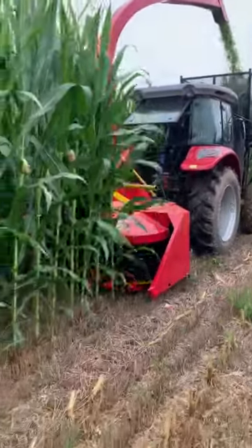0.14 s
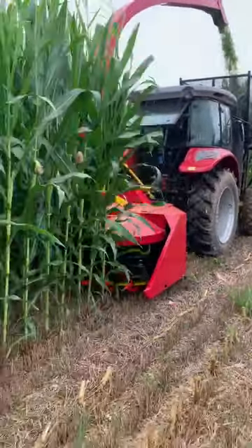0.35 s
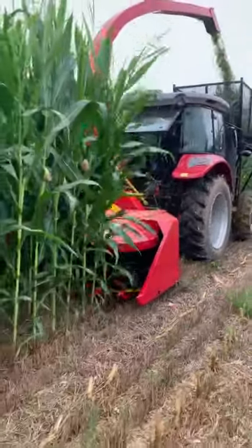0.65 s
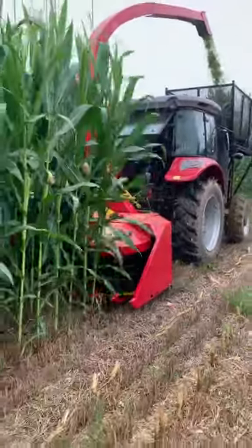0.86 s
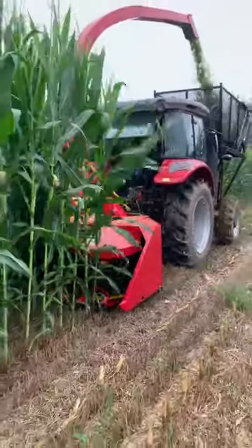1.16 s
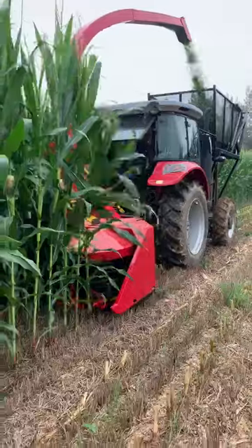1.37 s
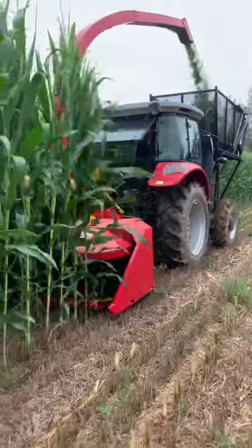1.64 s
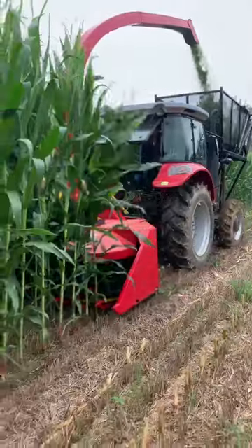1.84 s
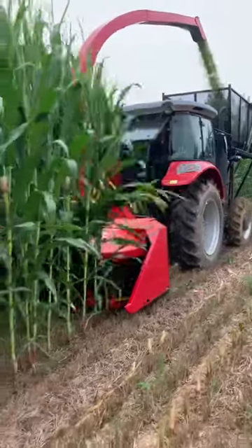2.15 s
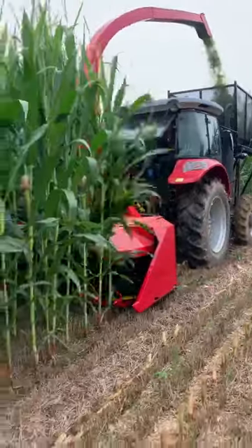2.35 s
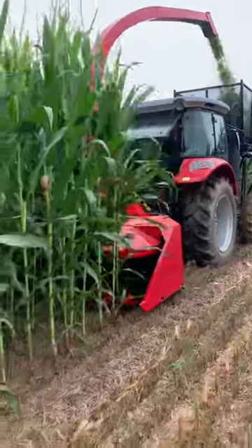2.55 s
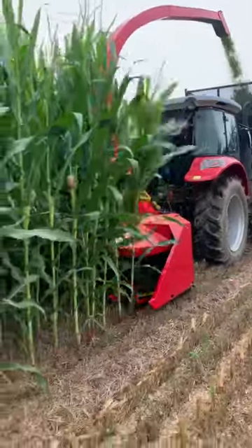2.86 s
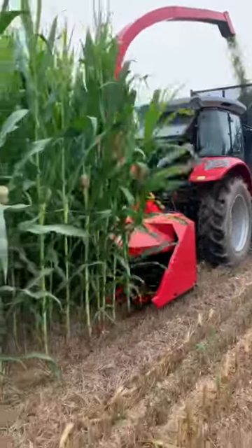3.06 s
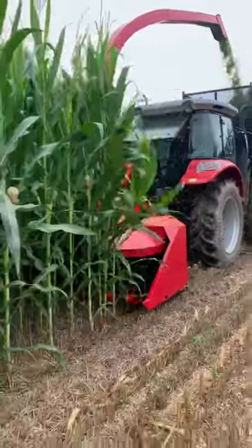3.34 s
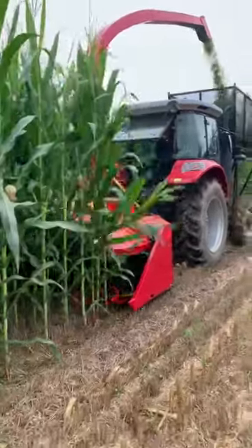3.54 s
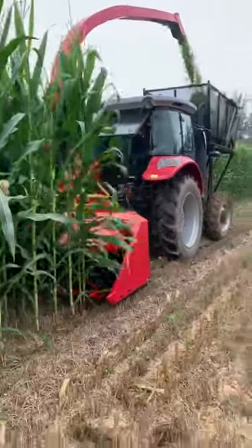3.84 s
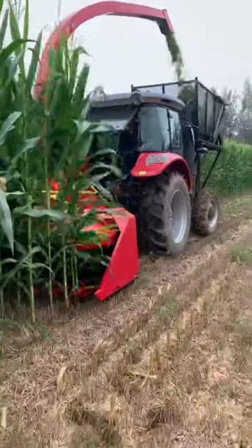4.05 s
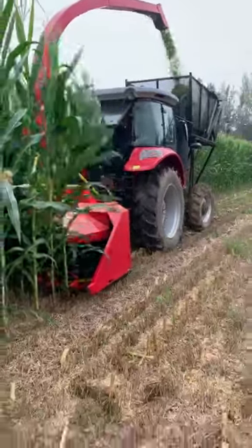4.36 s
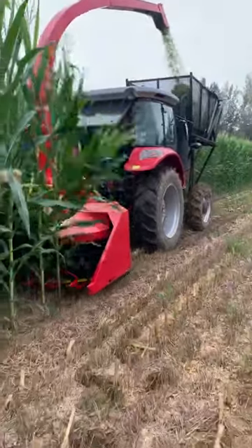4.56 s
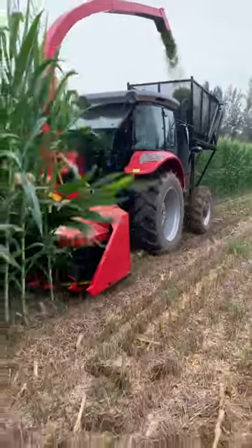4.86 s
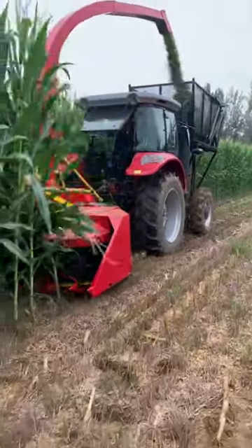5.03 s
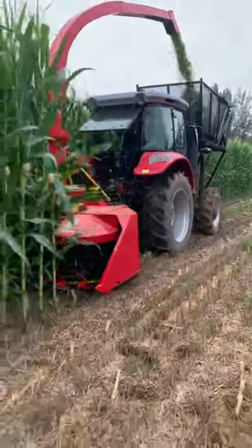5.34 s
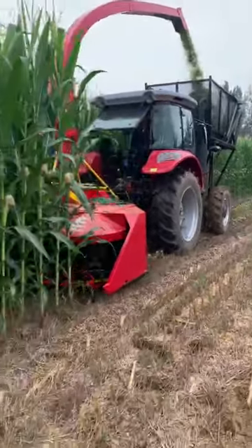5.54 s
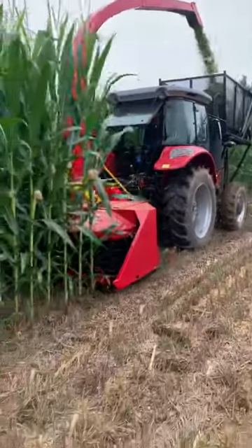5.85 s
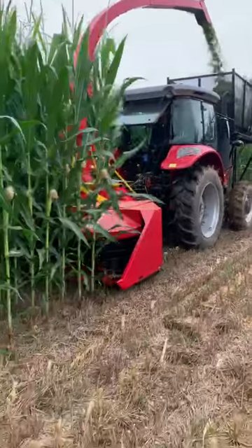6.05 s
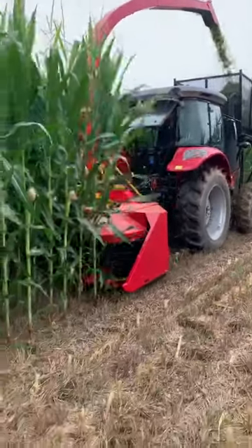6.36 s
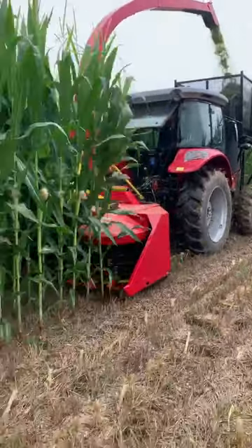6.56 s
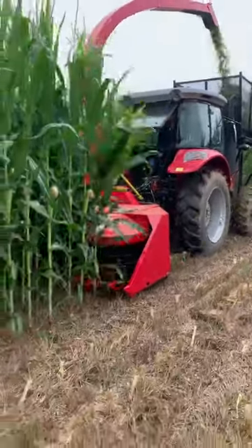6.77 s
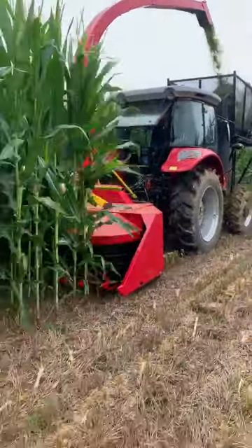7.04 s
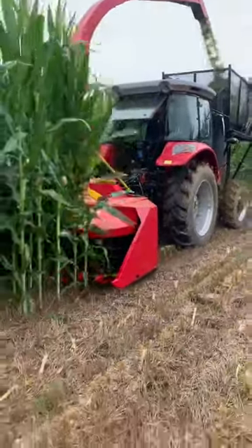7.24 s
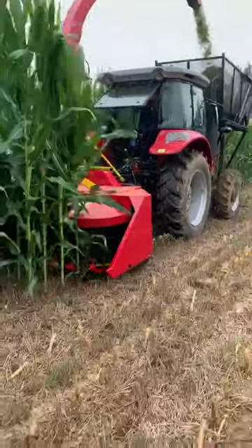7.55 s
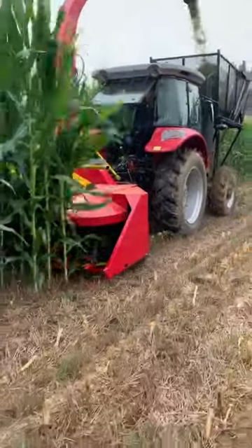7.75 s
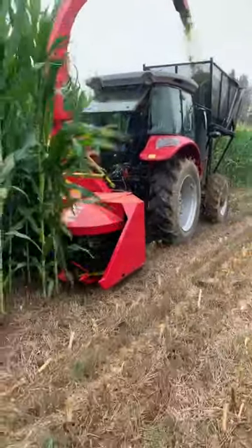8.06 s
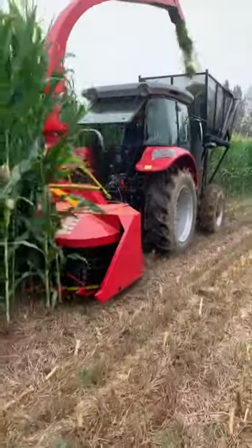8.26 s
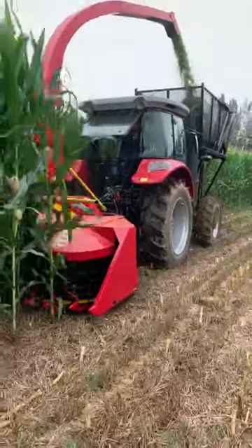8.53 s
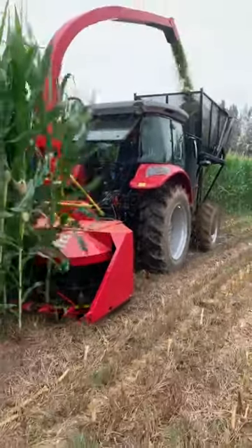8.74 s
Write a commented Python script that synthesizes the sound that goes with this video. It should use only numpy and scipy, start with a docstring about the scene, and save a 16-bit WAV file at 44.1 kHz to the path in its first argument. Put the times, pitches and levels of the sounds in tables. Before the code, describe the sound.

From 0 to about 8.9 seconds a tractor-driven chopper works steadily through tall maize, heard close in open air with wide stereo and no echo. A strong drone around 160 hertz holds throughout, dipping slightly under load, with an unsteady octave, thin wavering whines and a rough growl above and throbbing diesel rumble below. Knives rasp constantly in the midrange; leaves tear in several dry, bright gusts each second over a faint steady spout hiss. Stalks crack in a cluster at 0-0.8, then more sparsely, with cob knocks near 1.7 and 3.3. From 4.0 to 5.4 snaps and knocks thicken and the drone sags most, around 4.5-4.9. It eases and rises slightly in pitch from 6 to 7.5, with quick tearing bursts around 7. After 7.7 the load returns, the octave surges near 7.9, and snaps crowd 8.7-8.9, with a harder knock near 8.75. It stops mid-work.

```python
"""A chopper flywheel, tractor-driven through standing maize, drones at its blade rate and sags under load.
Its octave, whines and growl are wavering sines locked to the shaft; diesel and drive line hum and rumble below.
Knives rasp: noise and tiny cracks gated by the blade strokes. Leaves crackle as they tear, over a steady spout hiss.
Stalks crack and cobs knock at listed times: short decaying bursts of coloured noise."""
import sys
import numpy as np
from scipy import signal
from scipy.fft import rfft, irfft
from scipy.io import wavfile

SR = 44100
rng = np.random.default_rng(int(sys.argv[2]) if len(sys.argv) > 2 else 0)


def log_audio(samples):
    """Write samples as a 16-bit WAV file to the path given in sys.argv[1]."""
    # one column per channel
    frames = np.atleast_2d(samples).T
    # limit to full scale, then quantise
    limited = np.clip(frames, -1, 1)
    pcm = np.round(limited * 32767).astype(np.int16)
    wavfile.write(sys.argv[1], SR, pcm)


N = 392490
TIME = np.arange(N) / SR
BINS = np.arange(N // 2 + 1) * SR / N

# flywheel strain from the crop: [t/s, strain 0-1]
STRAIN = [(0.0, 0.5), (0.72, 0.49), (0.92, 0.39), (1.06, 0.48), (1.17, 0.3), (1.66, 0.68), (1.86, 0.46),
          (2.0, 0.57), (2.37, 0.51), (2.62, 0.31), (2.9, 0.5), (3.4, 0.47), (3.64, 0.72), (3.95, 0.37),
          (4.28, 0.27), (4.46, 0.98), (4.56, 0.59), (4.65, 1.0), (4.75, 0.62), (4.88, 1.0), (4.98, 0.59),
          (5.07, 0.67), (6.04, 0.12), (6.13, 0.26), (6.78, 0.04), (7.02, 0.28), (7.12, 0.08), (7.22, 0.21),
          (7.34, 0.0), (7.45, 0.5), (7.55, 0.09), (7.66, 0.14), (7.79, 0.87), (7.91, 0.51), (8.01, 0.71),
          (8.2, 0.65), (8.33, 0.88), (8.9, 0.65)]
# blade tone: [t/s, level/dB]
BLADE_LEVEL_DB = [(0.0, -20.5), (0.61, -19), (1.21, -23), (2.04, -21), (2.31, -18.5), (2.55, -20.5),
                  (4.02, -22), (4.36, -19.5), (4.48, -23), (6.44, -20), (6.58, -24), (7.54, -24.5),
                  (7.81, -21.5), (8.49, -19.5), (8.65, -26), (8.9, -23)]
# octave of the blade tone: [t/s, level/dB]
OCTAVE_LEVEL_DB = [(0.0, -34), (0.14, -21.5), (0.24, -29.0), (0.62, -23), (1.05, -28.5), (1.26, -28),
                   (1.38, -25.5), (2.05, -24.0), (2.28, -33), (2.45, -28), (2.78, -40), (2.85, -33),
                   (3.19, -26.0), (3.5, -25.5), (3.68, -31), (3.98, -27.0), (4.11, -37.0), (4.23, -23),
                   (4.4, -29), (4.77, -25.5), (4.86, -34.5), (5.18, -21), (5.63, -20), (5.76, -26.0),
                   (6.04, -20.5), (6.3, -31), (6.44, -28.5), (6.5, -40), (6.69, -32), (6.77, -34),
                   (6.93, -21.5), (7.02, -45), (7.39, -28.5), (7.48, -25), (7.6, -42), (7.66, -16),
                   (7.76, -33), (7.9, -13.5), (8.09, -31.0), (8.36, -22.5), (8.44, -37), (8.58, -17.5),
                   (8.74, -29.5), (8.9, -22)]
# whine at 5 x blade rate: [t/s, level/dB]
WHINE_LEVEL_DB = [(0.0, -36), (0.25, -35.5), (0.4, -32.5), (1.08, -28.5), (1.28, -36), (1.46, -28),
                  (1.77, -37), (2.01, -33), (2.32, -38.5), (2.49, -28.0), (2.62, -33.5), (2.99, -39),
                  (3.15, -30), (3.52, -38), (3.8, -27.5), (4.19, -43), (4.4, -27.5), (4.54, -35),
                  (5.01, -27), (5.26, -43), (5.37, -27.5), (5.75, -48), (6.09, -31), (6.44, -36),
                  (6.58, -36.5), (6.81, -38), (6.99, -37.5), (7.65, -56), (7.73, -32), (7.88, -29.5),
                  (8.16, -36), (8.6, -27), (8.76, -42), (8.9, -23.5)]
# upper whine at 6 x blade rate: [t/s, level/dB]
UPPER_WHINE_LEVEL_DB = [(0.0, -45), (0.16, -36), (0.36, -39), (0.48, -35.5), (0.6, -39), (1.44, -40),
                        (1.62, -33), (1.89, -53), (2.0, -33), (3.1, -48), (3.23, -31), (3.68, -40),
                        (3.82, -29), (3.98, -42.0), (4.28, -41.5), (4.64, -24), (4.79, -38), (5.16, -25.5),
                        (5.3, -39), (5.58, -32), (6.12, -36), (6.72, -34), (6.82, -35), (7.46, -54),
                        (7.88, -23.5), (8.06, -39), (8.18, -30), (8.9, -31)]
# knife-stroke overtones: [multiple of blade rate, level unstrained/dB, change at full strain/dB]
KNIFE_TONES = [(3, -48, 12), (4, -32.5, 2.5), (7, -53.5, 23.5), (8, -40, -3.5), (9, -59.5, 25),
               (10, -43.5, 3.5), (11, -60, -9)]
# diesel and drive-line hum: [multiple of blade rate, level before the rumble swell/dB]
DRIVE_TONES = [(.225, -53), (.45, -39), (.56, -45), (.675, -33.5), (1.35, -40.5), (1.578, -32.5),
               (1.665, -30.5), (1.73, -36.5), (2.25, -42.5), (2.525, -47.5), (4.451, -51), (5.4, -48.5)]
# swell shared by hum and rumble: [t/s, gain/dB]
RUMBLE_SWELL_DB = [(0.0, -2), (0.18, -2.5), (0.65, -0.5), (0.99, -1), (1.77, -1), (1.95, -2.5),
                   (2.84, -2.2), (3.57, -1.5), (4.23, -1), (5.05, -1), (5.3, -1.1), (6.22, -1),
                   (7.16, -1.8), (7.96, -0.5), (8.9, -2)]
# machine rumble spectrum: [f/Hz, relative level/dB]
RUMBLE_SPECTRUM = [(22, -48), (34, -25), (55, -9.5), (80, -6), (135, 1.5), (165, 0), (205, -5), (285, 2.5),
                   (370, -2.5), (430, -9.5), (520, -20.5), (700, -30), (1500, -32), (4000, -54),
                   (15000, -60)]
# chopping before trim and flutter: [t/s, level/dB]
CHOP_LEVEL_DB = [(0.0, -21), (1.34, -24.5), (1.42, -22.5), (2.2, -22.5), (2.69, -24.5), (3.6, -22.5),
                 (3.85, -24.5), (4.0, -26), (4.22, -24.5), (4.38, -23.5), (4.66, -21.5), (4.95, -21),
                 (5.12, -22.5), (5.77, -23), (6.28, -23), (6.52, -23.5), (7.61, -24.5), (7.84, -20.5),
                 (8.06, -21.5), (8.57, -21), (8.9, -23)]
# chopping spectrum: [f/Hz, relative level/dB]
CHOP_SPECTRUM = [(300, -25), (560, -7), (670, 1.5), (820, 4), (1000, 2.5), (1200, -1), (1400, 2),
                 (2000, -5), (2550, -6.5), (3200, -12.5), (5000, -33), (15000, -24)]
# plants torn into the intake: [t/s, hold/s, level before tear gain/dB, release/s]
TEARS = [(0.015, 0.0083, -29.5, .03), (0.054, 0.025, -30.5, 0.036), (0.149, .008, -28.5, 0.012),
         (0.27, .03, -42, .03), (0.346, .015, -27.5, 0.037), (0.41, 0.017, -25.5, 0.03),
         (0.494, 0.044, -31, 0.05), (0.655, 0.025, -34, .02), (0.736, 0.013, -29.5, 0.029),
         (0.794, 0.055, -31.5, 0.073), (1.143, 0.031, -27, 0.043), (1.24, .01, -43, .03),
         (1.414, 0.052, -28.5, 0.049), (1.782, 0.048, -28.5, 0.035), (1.859, 0.069, -30, 0.085),
         (2.055, 0.076, -33.5, 0.065), (2.195, 0.023, -27, 0.036), (2.558, 0.022, -27, 0.038),
         (2.872, .02, -33, 0.014), (3.046, 0.037, -29.5, 0.037), (3.151, 0.11, -33.5, .05),
         (3.351, 0.013, -26.5, 0.013), (3.437, 0.044, -33, 0.021), (3.598, 0.014, -29.5, 0.031),
         (3.739, 0.048, -32, 0.093), (3.912, 0.0095, -33, .01), (4.092, 0.025, -30, 0.064),
         (4.387, 0.013, -28.5, 0.029), (4.49, .01, -33, 0.044), (4.664, 0.079, -33.5, 0.033),
         (4.817, 0.02, -34, 0.017), (4.931, 0.04, -45, 0.039), (5.094, 0.029, -32.5, 0.03),
         (5.207, .015, -29, .03), (5.28, 0.031, -36, 0.031), (5.39, 0.034, -33.5, 0.023),
         (5.887, .07, -29.5, 0.062), (6.258, 0.13, -29, .04), (6.537, 0.018, -29.5, 0.021),
         (6.653, 0.015, -28.5, 0.04), (6.726, 0.014, -28.5, 0.061), (6.89, .03, -31.5, 0.017),
         (6.954, 0.0081, -31, 0.021), (7.027, 0.031, -27.5, 0.021), (7.101, 0.041, -40, 0.029),
         (7.223, 0.0073, -32, .015), (7.335, 0.049, -27.5, 0.031), (7.412, .01, -32.5, 0.037),
         (7.507, 0.0093, -28.5, 0.026), (7.617, 0.026, -27, .015), (7.672, 0.044, -30, 0.046),
         (7.785, 0.068, -33, 0.055), (7.944, 0.086, -36.5, 0.033), (8.034, 0.062, -26, 0.05),
         (8.351, 0.05, -27.5, 0.042), (8.447, 0.048, -30, 0.048), (8.681, 0.027, -28.5, 0.018),
         (8.761, 0.034, -31.5, 0.089)]
# fracture ring ranges, thick stalk to thin leaf: [lower edge f/Hz, upper edge f/Hz]
FIBRE_BANDS_HZ = [(1200, 3200), (3200, 5500), (5500, 7500), (7500, 11000), (11000, 16000)]
# leaf and spout spectrum: [f/Hz, relative level/dB]
LEAF_SPECTRUM = [(1000, -7), (2500, 5), (3400, 2), (4000, 4.5), (4600, 3.5), (5500, 2), (6100, 1.5),
                 (6800, 3.5), (7600, -0.5), (8300, 1.5), (9500, -6), (10500, -4), (12400, -1),
                 (14000, -6.5), (15500, -18)]
# stalks breaking: [t/s, level before stalk trim/dB, ring f/Hz, ring strength/dB]
SNAPS = [(0.033, -13, 3730, 0), (0.173, -15, 11900, 8), (0.275, -22, 13400, 9), (0.369, -11, 13700, 9),
         (0.404, -14, 3800, 14), (0.427, -18, 14000, 3), (0.436, -13, 2510, 6), (0.471, -20, 4040, 6),
         (0.504, -20, 3200, 8), (0.746, -17, 7100, 7), (0.789, -22, 2500, 5), (0.822, -18, 7100, 9),
         (0.915, -18, 10100, 4), (1.25, -24, 13500, 13), (1.45, -15, 5400, 7), (1.903, -20, 8900, 5),
         (2.138, -15, 4100, 13), (2.213, -20, 8200, 5), (2.268, -14.5, 8600, 1), (2.301, -18, 10400, 5),
         (2.521, -17, 6820, 6), (2.529, -22, 10200, 7), (2.58, -15, 4410, 7), (2.664, -22, 13800, 8),
         (3.123, -22, 4100, 2), (3.234, -17, 6700, 9), (3.243, -19, 3505, 9), (3.267, -26, 2800, 7),
         (3.299, -18, 3200, 6), (3.367, -9.5, 6480, 7), (3.42, -15, 13400, 6), (3.667, -15, 2800, 9),
         (3.969, -14, 4216, 8), (4.025, -20, 2693, 12), (4.102, -12.5, 2700, 15), (4.113, -15, 13400, 5),
         (4.154, -10.5, 5300, 9), (4.177, -18, 3100, 11), (4.211, -15.5, 2800, 10), (4.243, -20, 5700, 1),
         (4.405, -8, 4917, 6), (4.441, -17, 2900, 7), (4.473, -15.5, 6700, 5), (4.509, -25, 3500, 4),
         (4.713, -16, 3900, 15), (4.842, -12, 6940, 9), (5.227, -16, 3500, 0), (5.273, -17, 3000, 8),
         (5.375, -14, 2890, 21), (5.948, -13.5, 4303, 7), (5.994, -21, 3800, 6), (6.011, -19, 4220, 4),
         (6.327, -14, 10000, 5), (6.669, -14, 10300, 1), (6.71, -15.5, 3207, 2), (7.014, -16, 3292, 11),
         (7.101, -14, 6600, 2), (7.133, -16.5, 12600, 2), (7.385, -14, 13510, 6), (7.405, -20, 3280, 6),
         (7.427, -17, 8400, 4), (7.623, -19, 11800, 8), (7.643, -15, 9800, 9), (7.686, -13.5, 12200, 10),
         (7.719, -20, 8300, 5), (7.837, -18, 2615, 10), (8.114, -13, 13510, 1), (8.148, -17, 9340, 6),
         (8.18, -20, 2500, 4), (8.402, -14, 4025, 14), (8.513, -19, 6760, 7), (8.704, -13, 10730, 5),
         (8.711, -19, 5300, 10), (8.746, -15.5, 8005, 7), (8.78, -13.5, 2800, 8), (8.813, -23, 2700, 4),
         (8.858, -23, 3093, 9)]
# stalk crack spectrum: [f/Hz, relative level/dB]
CRACK_SPECTRUM = [(1000, -22), (2500, 2), (4000, 0.5), (5300, 5.5), (6800, 2), (9500, 2), (12400, -4),
                  (14000, 2), (15500, -6)]
# cobs hitting the steel feed throat: [t/s, level before cob trim/dB]
KNOCKS = [(1.6837, -16), (3.2592, -18), (4.104, -26), (4.353, -14), (4.44, -14.5), (4.6296, -17),
          (5.1322, -28), (5.374, -16), (5.589, -22), (7.824, -19), (8.2396, -51), (8.6953, -21),
          (8.745, -12.5)]
# feed-throat ring: [f/Hz, relative level/dB]
THROAT_SPECTRUM = [(500, -20), (900, -12), (1300, 20), (1900, -16), (2600, 6), (4000, -28), (8000, -43)]
# phase between the two pickup ports: [f/Hz, left lead/rad]
PORT_PHASE_RAD = [(50, -.1), (150, -.28), (350, -.25), (500, -1.3), (640, -3.14), (720, -5.2), (820, -6.1),
                  (1000, -6.75), (1300, -6.75), (1500, -5.85), (1850, -6), (2150, -5.3), (2600, -7.2),
                  (3400, -9.4), (4000, -9.9), (4400, -9.45), (5100, -9.35), (5600, -8.2), (6300, -6.35),
                  (7700, -6.2), (8500, -4.7), (9100, -3.25), (10400, -3.05), (11600, -.1), (13400, .15),
                  (14200, 3), (15500, 3.15)]
# level between the ports: [f/Hz, left minus right/dB]
PORT_BALANCE_DB = [(40, -.5), (160, -2.8), (300, -.3), (500, -.2), (750, -7.5), (1000, -1.2), (1400, -3.5),
                   (2200, -.4), (4000, -1), (4800, 0)]
# stereo width, unrelated against shared sound: [f/Hz, level/dB]
WIDTH_DB = [(50, -16), (300, -15), (600, 3.5), (950, -10.5), (1450, 1.5), (1750, -10), (2200, 0.5),
            (2600, -8), (3500, 2.5), (4200, -1.5), (4850, -20.5), (5800, 13), (6450, -21), (7350, -24),
            (7800, -7), (8700, 4), (9250, -71), (10150, -35), (10600, -7.5), (11300, 4), (11900, -20),
            (12800, -24), (13400, -2), (14000, -2), (14700, -27), (15500, -24)]

FREE_HZ, SAG_HZ, INERTIA_S = 165.67, 5.93, 0.07  # unstrained blade rate, drop at full strain, lag
CHOP_TRIM_DB, CHOP_FLUTTER_DB = -0.84, 0.2
TEAR_ATTACK_S, TEAR_GAIN_DB = 0.012, 4
BRUSH_BASE_DB, BRUSH_SWELL_DB, BRUSH_PER_S = -32.5, 0.9, 26  # leaves brushing between tears
BRUSH_FOLLOWS = 0.65  # share of the chopping's dB swings taken up by the brushing
SPLITS_PER_S, SPLIT_SIZE, SPLIT_DECAY_S = 57, 0.56, 0.0039
SPLINTER_HZ, SPLINTER_CYCLES = (2700, 14650), 33  # pitch range, cycles to decay
SPLINTER_SPREAD_DB, SPLINTER_DB = 9, -4.5  # range of strength, level before the mix is normalised
SNAP_RING_Q = 5.2
CRUNCH_S, THICK_HZ, CRUNCH_LAW = 0.0063, 5500, 0.23  # decay at THICK_HZ; longer for lower rings
TOP_HZ = 15550


def undb(db):
    """Decibels to gain."""
    return np.exp(np.asarray(db) * (np.log(10) / 20))


def unit(x):
    """Scale to rms 1."""
    return x / np.sqrt(np.mean(x ** 2))


def curves(table):
    """Interpolate each column of a time table to every sample."""
    s, *columns = np.transpose(table)
    return [np.interp(TIME, s, c) for c in columns]


def across(points):
    """Interpolate a frequency table to every bin on a log axis."""
    hz, value = np.transpose(points)
    return np.interp(np.log(BINS + 1), np.log(hz), value)


def colour(x, points):
    """Shape the spectrum of x; rms 1."""
    return unit(irfft(rfft(x) * undb(across(points)), N))


def noise():
    """Independent noise for three paths: shared by both ports, left only, right only."""
    return rng.standard_normal((3, N))


def walk(rate):
    """Smooth random curve, about rate changes a second; spread 1."""
    steps = rng.standard_normal(8192)
    hz = np.arange(len(steps) // 2 + 1) * SR / N  # bins once stretched to N samples
    slow = unit(irfft(rfft(steps) / (1 + (2 * hz / rate) ** 4)))
    return np.interp(TIME, np.linspace(0, TIME[-1], len(slow)), slow)


def tone(turns, wander, flutter_db, rate):
    """Sine of wavering phase (wander in rad) and strength; rms 1."""
    sine = np.sin(2 * np.pi * turns + wander * walk(rate))
    return unit(sine * undb(flutter_db * walk(rate)))


def strokes(turns, length):
    """Gate that opens once per cycle and decays within it; length in cycles, rms 1."""
    return unit(np.exp(-(turns % 1) / length))


def fractures(per_s, spread_db):
    """Tiny cracks at random times, exponentially spread in dB, signs independent per path; rms 1."""
    pool = 60000
    places = rng.integers(0, N, pool)
    kept = rng.random(pool) < per_s * TIME[-1] / pool
    signs = rng.choice([-1, 1], (3, pool))
    size = np.minimum(rng.exponential(size=pool), 5)
    cracks = np.zeros((3, N))
    cracks[:, places] = kept * signs * undb(spread_db * size)
    return unit(cracks)


def blade_rate(strain):
    """Blade rate in Hz: falls in proportion to strain, lagged by flywheel inertia."""
    keep = np.exp(-1 / (INERTIA_S * SR))
    felt = strain[0] + signal.lfilter([1 - keep], [1, -keep], strain - strain[0])
    return FREE_HZ - SAG_HZ * felt


def flywheel(turns, strain):
    """Paddles pass the spout opening: drone, less steady octave, whines, and a strain-dependent growl."""
    blade_db, = curves(BLADE_LEVEL_DB)
    octave_db, = curves(OCTAVE_LEVEL_DB)
    whine_db, = curves(WHINE_LEVEL_DB)
    upper_db, = curves(UPPER_WHINE_LEVEL_DB)
    drone = undb(blade_db + 0.4 * walk(13.0)) * tone(turns, wander=0.17, flutter_db=-0.16, rate=49)
    octave = undb(octave_db) * tone(2 * turns, wander=0.47, flutter_db=1.5, rate=18)
    whine = undb(whine_db) * tone(5 * turns, wander=0.71, flutter_db=3.0, rate=36)
    upper_whine = undb(upper_db) * tone(6 * turns, wander=0.83, flutter_db=2.7, rate=35)
    growl = 0
    for multiple, db, strain_db in KNIFE_TONES:
        overtone = tone(round(multiple) * turns, wander=1.0, flutter_db=4.5, rate=27.6)
        growl = growl + undb(db + strain_db * strain) * overtone
    # unequal knives: a swell every three strokes
    thirds = 1 + 0.057 * np.sin(2 * np.pi * turns / 3)
    return drone + octave + (whine + upper_whine + growl) * thirds


def drive_line(turns):
    """Diesel, shafts and gears hum at fixed ratios to the blade rate."""
    return sum(undb(db) * tone(multiple * turns, wander=0.67, flutter_db=3.0, rate=9.7)
               for multiple, db in DRIVE_TONES)


def rumble(turns):
    """Engine firings throb in the broadband rumble of the machine."""
    throb = 1 + 0.32 * strokes(0.675 * turns, length=0.13)
    return undb(-22.0) * colour(noise() * throb, RUMBLE_SPECTRUM)


def knives(turns, chop_db, count=6):
    """Knife strokes rasp through uneven crop; part of the clatter repeats one flywheel turn later."""
    bite = undb(1.16 * walk(41) + 0.5 * walk(19))
    gate = 1 + 0.092 * strokes(turns, length=0.96)
    fresh = gate * bite * (noise() + 0.5 * fractures(per_s=2500, spread_db=-2.0))
    last_turn = np.searchsorted(turns, turns - count)
    clatter = fresh + 0.22 * (turns > count) * fresh[:, last_turn]
    return undb(chop_db) * colour(clatter, CHOP_SPECTRUM)


def feed(chop_db):
    """Tearing gain: attack, hold and release per plant, power-summed with randomly brushing leaves."""
    flow_db = BRUSH_FOLLOWS * (chop_db - np.mean(chop_db))
    power = undb(BRUSH_BASE_DB + flow_db + BRUSH_SWELL_DB * walk(BRUSH_PER_S)) ** 2
    for s, hold_s, db, release_s in TEARS:
        near = slice(max(int(s * SR), 0), int(s * SR) + SR // 2)
        age_s = TIME[near] - s
        attack = np.clip(age_s / TEAR_ATTACK_S, 0, 1)
        release = np.exp(-np.maximum(age_s - TEAR_ATTACK_S - hold_s, 0) / release_s)
        power[near] += (undb(db + TEAR_GAIN_DB) * attack * release) ** 2
    return np.sqrt(power)


def splits():
    """Leaf ribs split at random: the crackle gain jumps and decays at once; rms 1."""
    chance, size = rng.random((2, N))
    jumps = (chance < SPLITS_PER_S / SR) * size
    decay = np.exp(-1 / (SPLIT_DECAY_S * SR))
    return unit(1 + SPLIT_SIZE * signal.lfilter([1], [1, -decay], jumps))


def splinters(count=3000, size=256):
    """Single fibres part: short decaying pings at random pitches, signs random per path; rms 1."""
    when, pitch, strength = rng.random((count, 3)).T[:, :, None]
    low_hz, high_hz = SPLINTER_HZ
    cycles = low_hz * (high_hz / low_hz) ** pitch * np.arange(size) / SR
    ring = np.sin(2 * np.pi * cycles) * np.exp(-cycles / SPLINTER_CYCLES)
    pings = undb(-SPLINTER_SPREAD_DB * strength) * ring
    places = (when * (N - size)).astype(int) + np.arange(size)
    paths = []
    for _ in range(3):
        signs = rng.choice([-1, 1], (count, 1))
        paths.append(np.bincount(places.ravel(), (pings * signs).ravel(), N))
    return unit(np.array(paths))


def intake(turns, chop_db):
    """Feed teeth and roller tear leaves and stalks in gusts of crackle, over the even hiss of the spout."""
    teeth = strokes(0.56 * turns, length=0.56)
    roller = strokes(0.37 * turns, length=0.77)
    grab = unit(1 + 0.049 * teeth + 0.046 * roller) * splits()
    tearing = fractures(per_s=1500, spread_db=2.0) + 1.3 * noise()
    crackle = 0
    for low_hz, high_hz in FIBRE_BANDS_HZ:
        band = signal.butter(2, [low_hz, high_hz], "band", fs=SR, output="sos")
        cracks = signal.sosfilt(band, fractures(per_s=2400, spread_db=-1.0))
        crackle = crackle + undb(6.5 * np.tanh(walk(37))) * cracks
    torn = grab * (tearing + 2.0 * crackle + undb(SPLINTER_DB) * splinters())
    leaves = feed(chop_db) * colour(torn, LEAF_SPECTRUM)
    spout = undb(-42.0) * colour(noise(), LEAF_SPECTRUM)
    return leaves + spout


def stalks():
    """Outer fibres give, then a sharp crack and a crunch: low and longer if thick, high and shorter if thin."""
    out, crack = np.zeros((3, N)), colour(noise(), CRACK_SPECTRUM)
    for s, db, ring_hz, ring_db in SNAPS:
        near = slice(max(int(s * SR) - SR // 20, 0), int(s * SR) + SR // 10)
        age_s = TIME[near] - s
        bending = 0.3 * np.exp(-np.abs(age_s) / 0.0028)
        crunch_s = CRUNCH_S * (THICK_HZ / ring_hz) ** CRUNCH_LAW
        snap = 0.75 * np.exp(-np.abs(age_s) / 0.0004)
        crunch = 1.12 * np.exp(-np.abs(age_s) / crunch_s)
        envelope = np.where(age_s < 0, bending, snap + crunch)
        peak = signal.iirpeak(min(ring_hz, TOP_HZ), SNAP_RING_Q, fs=SR)
        ring = signal.lfilter(*peak, crack[:, near])
        out[:, near] += undb(db) * envelope * unit(crack[:, near] + (undb(ring_db) - 1) * ring)
    return undb(-5.5) * out


def cobs():
    """Hard cobs knock the feed throat; crop packed around it damps the ring."""
    force = np.zeros(N)
    for s, db in KNOCKS:
        start = int(s * SR)
        age_s = TIME[:min(N - start, SR // 20)]
        force[start:start + len(age_s)] += undb(db) * np.exp(-age_s / 0.019)
    return undb(-6.5) * force * colour(noise(), THROAT_SPECTRUM)


def ports(tones, noises):
    """Shared sound meets two ports out of step; an unrelated left and right part widens it, set per frequency."""
    paths, side = rfft(noises), np.array([[1], [-1]])
    lead = np.exp(0.5j * side * across(PORT_PHASE_RAD))
    width = undb(across(WIDTH_DB))
    widened = (lead * paths[0] + width * paths[1:]) / np.sqrt(1 + width ** 2)
    balance = undb(side * across(PORT_BALANCE_DB) / 2)
    return irfft((lead * rfft(tones) + widened) * balance, N)


def scene():
    """Crop strain sets the shaft speed; one shaft phase drives every rotating part."""
    strain, = curves(STRAIN)
    chop_db, = curves(CHOP_LEVEL_DB)
    swell_db, = curves(RUMBLE_SWELL_DB)
    turns = np.cumsum(blade_rate(strain)) / SR  # in blade passes
    swell = undb(swell_db)
    tones = flywheel(turns, strain) + swell * drive_line(turns)
    chopping = knives(turns, chop_db + CHOP_TRIM_DB + CHOP_FLUTTER_DB * walk(24))
    crop = chopping + intake(turns, chop_db) + stalks() + cobs()
    return ports(tones, swell * rumble(turns) + crop)


def record(dry):
    """Steep low-pass at TOP_HZ."""
    return irfft(rfft(dry) / np.sqrt(1 + (BINS / TOP_HZ) ** 600), N)


dry = scene()
out = record(dry)
log_audio(out)
```